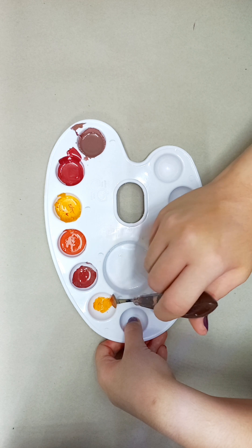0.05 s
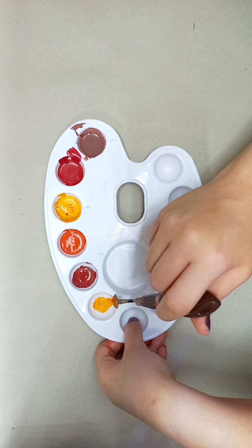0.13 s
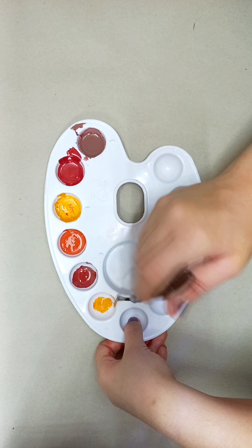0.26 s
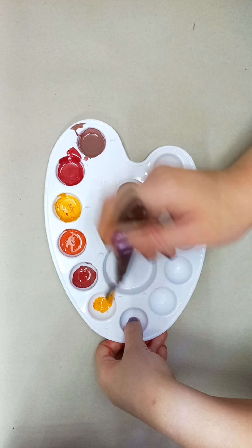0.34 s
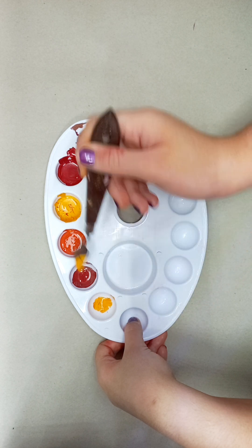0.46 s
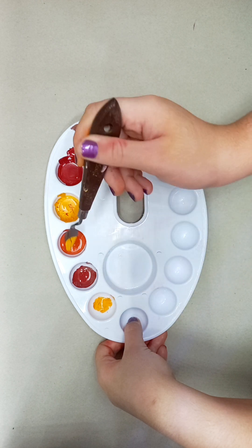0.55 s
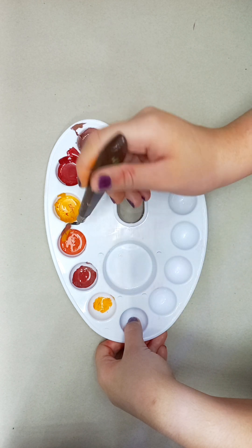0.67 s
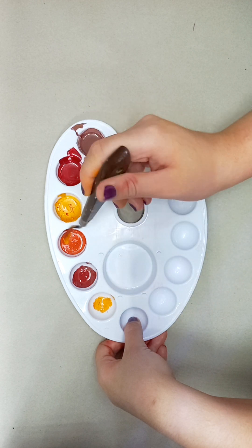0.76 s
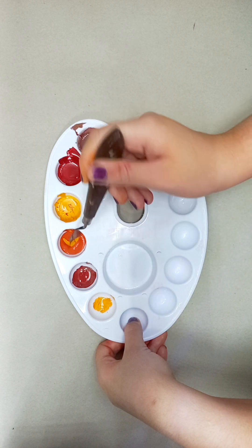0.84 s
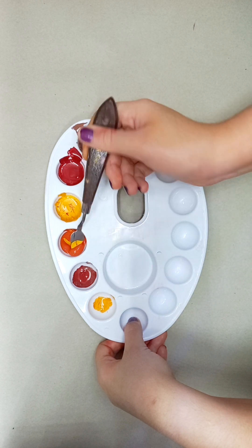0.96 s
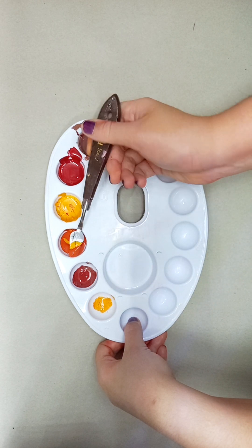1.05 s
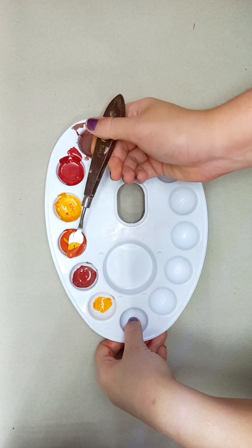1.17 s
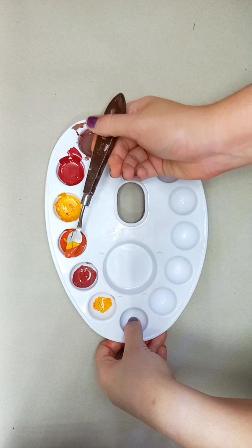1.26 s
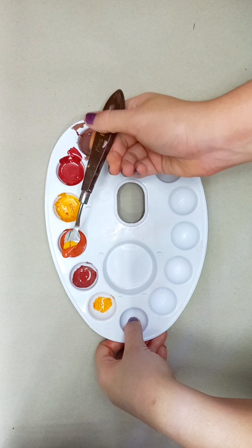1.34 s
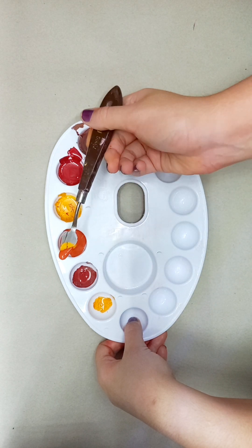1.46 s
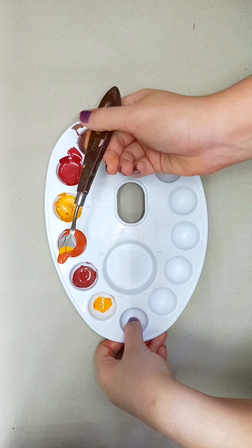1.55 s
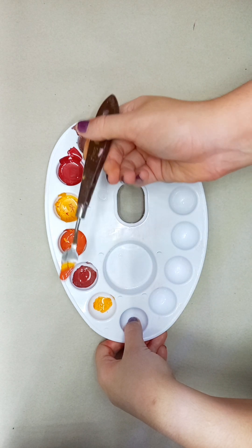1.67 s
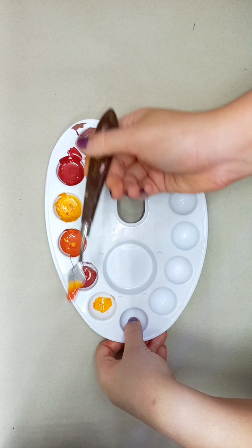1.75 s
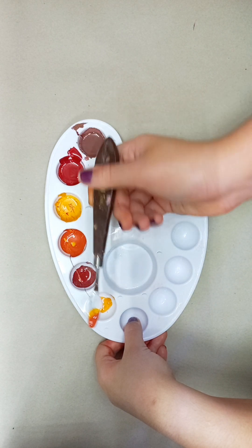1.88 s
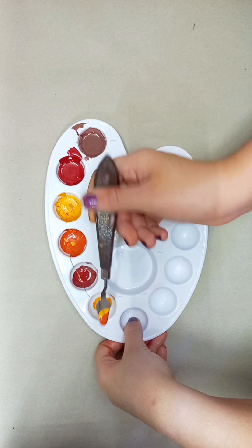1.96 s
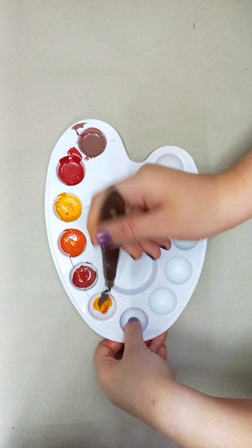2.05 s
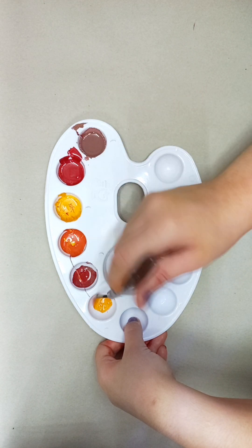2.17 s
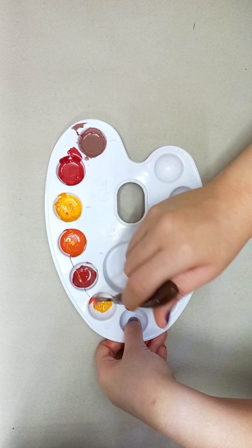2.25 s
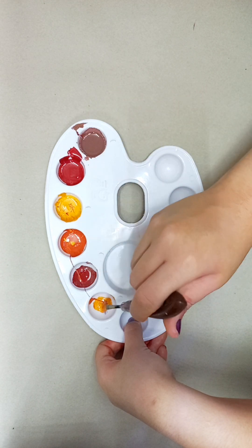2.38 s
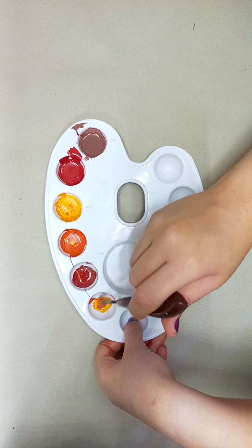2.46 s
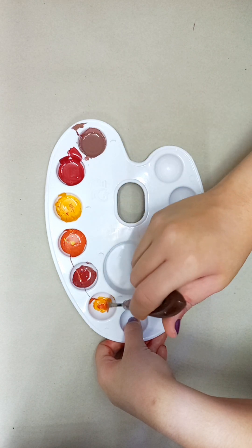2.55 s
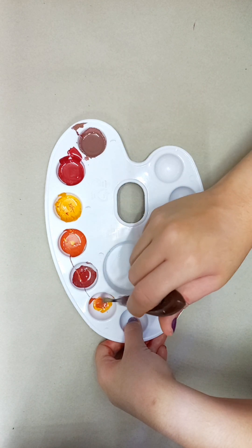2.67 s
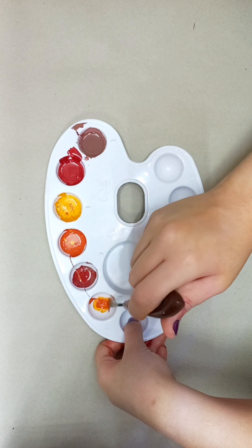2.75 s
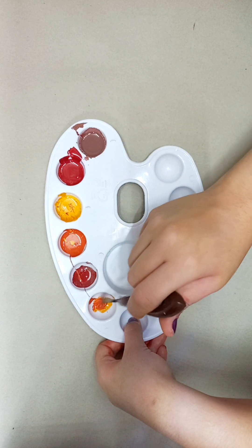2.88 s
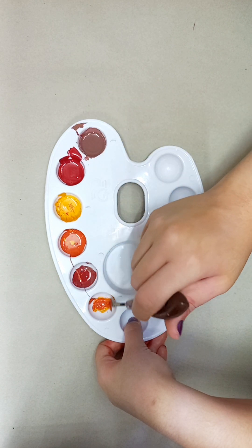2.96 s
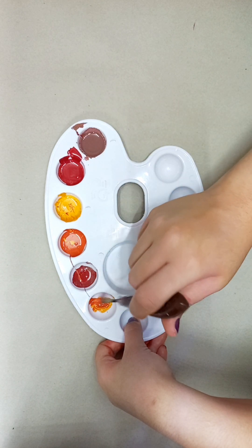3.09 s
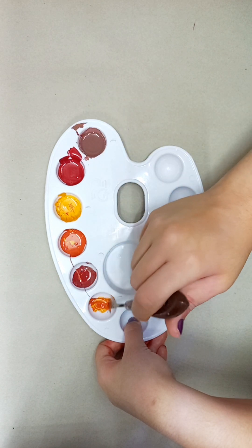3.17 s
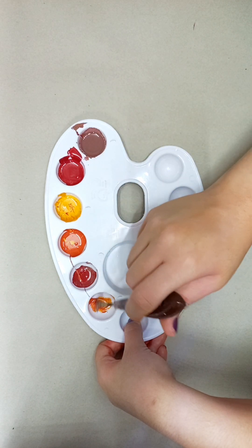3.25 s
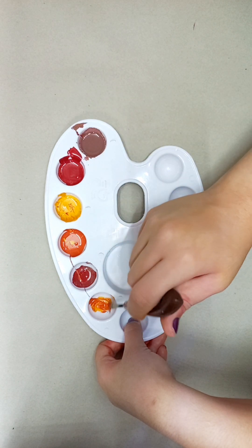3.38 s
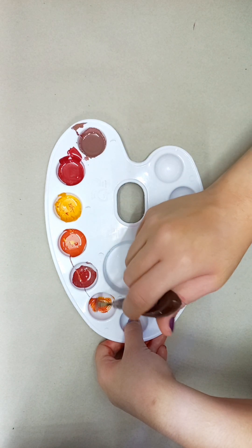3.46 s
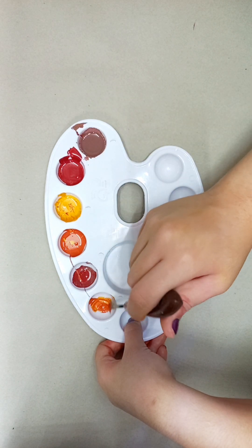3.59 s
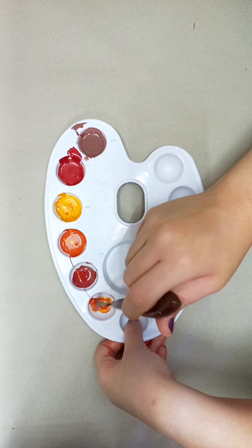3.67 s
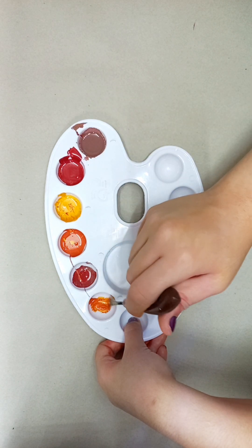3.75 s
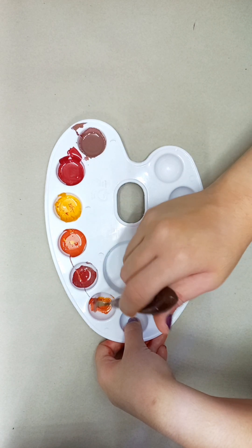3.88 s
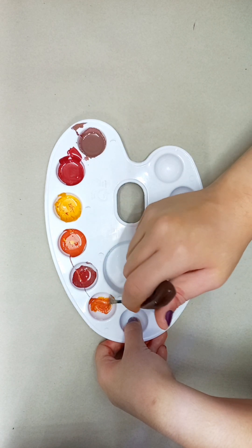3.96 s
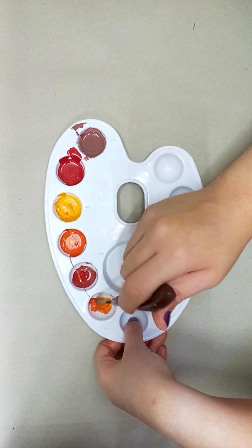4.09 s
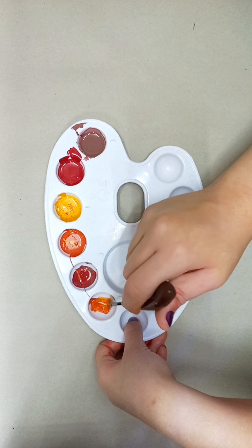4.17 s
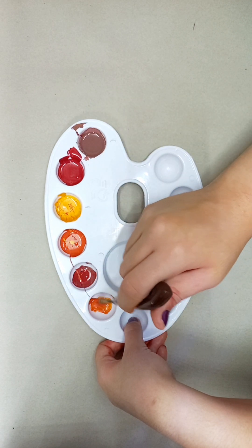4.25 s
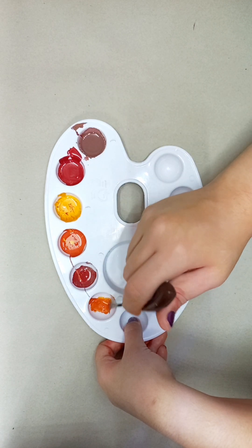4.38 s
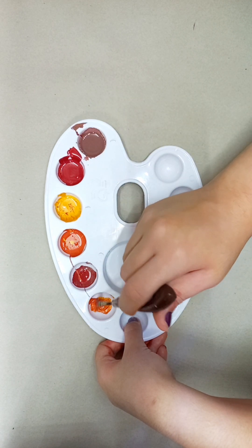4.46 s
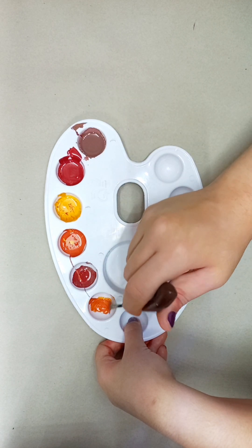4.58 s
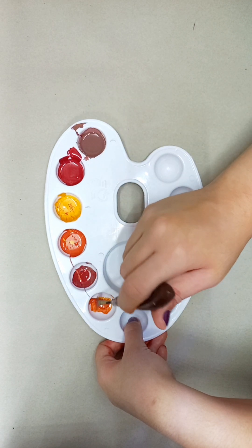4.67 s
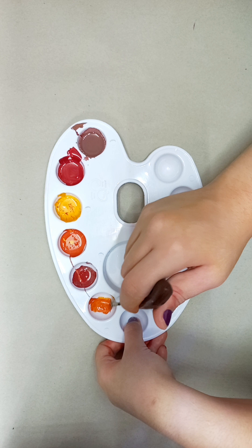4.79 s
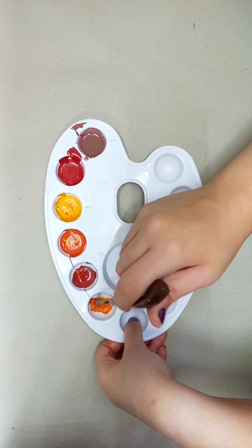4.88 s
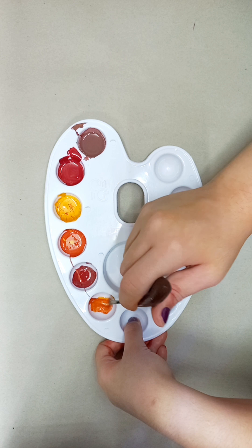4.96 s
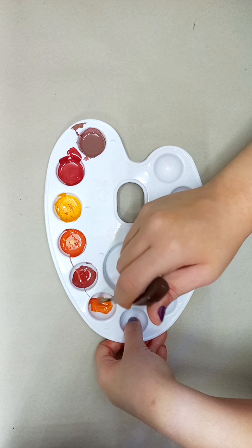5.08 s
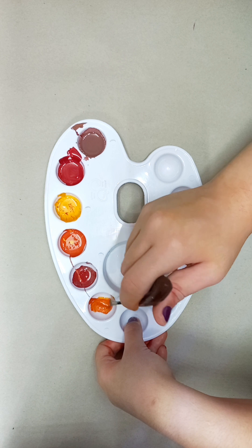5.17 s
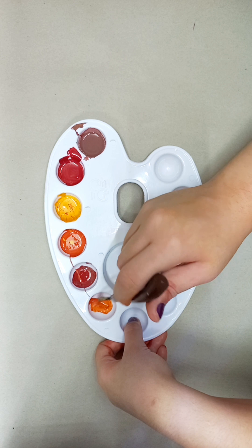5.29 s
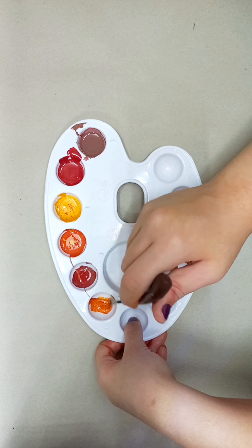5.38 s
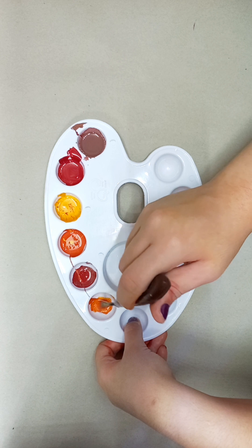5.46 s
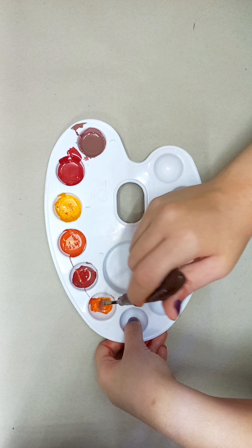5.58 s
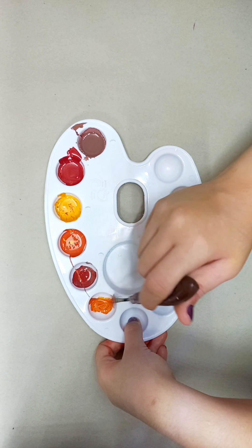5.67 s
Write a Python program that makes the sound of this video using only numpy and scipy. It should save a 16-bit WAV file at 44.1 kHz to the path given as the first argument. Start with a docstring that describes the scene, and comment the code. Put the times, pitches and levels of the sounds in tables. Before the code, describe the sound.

A metal palette knife knocks on a plastic palette, then stirs wet paint with steady clacks in a quiet room.

```python
"""A desk in a small quiet room: a steel palette knife works paint on a hand-held plastic palette.
It knocks paint off, scoops from another well, then stirs, clacking on the well's wall five times a second.
Each contact rings damped modes of plastic and steel; between contacts wet paint smears, crackles and pops.
The palette bumps and rumbles on the desk; ventilation hums in the background."""
import sys
import numpy as np
from scipy import signal
from scipy.fft import rfft, irfft, next_fast_len
from scipy.io import wavfile

SR = 44100
rng = np.random.default_rng(int(sys.argv[2]) if len(sys.argv) > 2 else 0)


def transcribe(u):
    """Save the signal u as a 16-bit wav file named by the first command-line argument.

    u: samples, shape (n,) or (channels, n), limited to [-1, 1]; the rate is SR.
    q: integer samples, one column per channel.
    """
    v = np.clip(np.atleast_2d(u).T, -1, 1)
    q = np.round(v * 32767).astype(np.int16)
    wavfile.write(sys.argv[1], SR, q)


N = 252693
TIME_S = np.arange(N) / SR
AGE_S = np.arange(SR // 15) / SR   # time since a contact
LEAD = SR // 10   # samples before time 0, so the room already rings
SIDES = np.array([[.5], [-.5]])   # splits a left-right difference

# desk thump spectrum: (frequency [Hz], density [dB])
DESK_SPECTRUM = [(70, 3.5), (130, 4.5), (250, 1), (350, -8.5), (500, 0), (650, -24.5), (900, -36)]
# blade meets the well's wall: (time [s], force [dB], well pitch [Hz], edge-on [dB])
STIR_CONTACTS = [(2.516, -10.5, 774, -2), (2.5756, -27, 780, -5), (2.6338, -23, 827, -11),
                 (2.6818, -9.5, 767, -17), (2.887, -1, 858, -5), (3.124, -1.5, 891, 4),
                 (3.3164, 0, 913, -2.5), (3.5186, .5, 912, -2), (3.727, -0.5, 926, 1.5),
                 (3.9399, -1, 934, 5), (4.1422, 1, 930, 1), (4.333, -2, 816, 2), (4.5175, 1, 895, -5.5),
                 (4.7221, 2, 913, -3), (4.9427, 0.83, 925, 3), (5.1429, -1, 870, 0.5),
                 (5.3314, 1.37, 925, 3)]
# scooping and spreading: (middle [s], half-width [s], smear [dB], rumble [dB])
PAINT_DRAGS = [(0.82, 0.026, -48.5, -64), (0.91, 0.068, -50.5, -62), (2.48, 0.05, -61, -50),
               (2.775, .035, -54.5, -51), (4.6, 0.023, -62, -46), (5.53, 0.086, -57, -52)]


def from_db(db):
    """Decibels to gain."""
    return 10 ** (np.asarray(db) / 20)


def unit_rms(x):
    """Scale to rms 1."""
    return x / np.sqrt(np.mean(x ** 2) + 1e-20)


def unit_hit(x):
    """Scale to rms 1 over the first 12 ms."""
    return x / np.sqrt(np.mean(x[:, :round(.012 * SR)] ** 2) + 1e-20)


def at_hz(points, hz):
    """Interpolate on a log-frequency axis."""
    point_hz, value = np.transpose(points)
    return np.interp(np.log(hz + 1), np.log(point_hz), value)


def coloured(x, spectrum, stretch=1):
    """Minimum-phase filter; falls steeply beyond the spectrum's ends."""
    taps = 8192 if x.shape[-1] > len(AGE_S) else 2048
    hz = np.fft.rfftfreq(taps, 1 / SR) / stretch + 1e-3
    skirts = np.clip(np.minimum(hz / spectrum[0][0], spectrum[-1][0] / hz), .3, 1) ** 6
    gain = from_db(at_hz(spectrum, hz)) * skirts
    cepstrum = irfft(np.log(gain))[:taps // 2]
    cepstrum[1:] *= 2
    kernel = irfft(np.exp(rfft(cepstrum, taps)))
    padded = next_fast_len(x.shape[-1] + taps, True)
    return irfft(rfft(x, padded) * rfft(kernel, padded), padded)[:, :x.shape[-1]]


def stereo_noise(size):
    """White noise, left and right alike in the bass only."""
    # diffuse field: (frequency [Hz], left-right correlation [1])
    correlation = [(50, 1), (130, 0.86), (280, 0.66), (700, 0.23), (1500, 0.21), (4000, 0), (7000, 0)]
    padded = next_fast_len(size, True)
    mid, side = rfft(rng.standard_normal((2, padded)))
    alike = np.clip(at_hz(correlation, np.fft.rfftfreq(padded, 1 / SR)), -.99, .99)
    left_right = np.sqrt(1 + alike) * mid + np.sqrt(1 - alike) * side * [[1], [-1]]
    return unit_rms(irfft(left_right, padded)[:, :size])


def diffuse(spectrum, size):
    """Coloured stereo noise, rms 1."""
    return unit_rms(coloured(stereo_noise(size), spectrum))


def fade(t, rise_s, t60_s):
    """Quick rise, exponential decay."""
    return (1 - np.exp(-t / rise_s)) * from_db(-60 * t / t60_s)


def burst(spectrum, rise_s, t60_s):
    """Decaying coloured noise."""
    return unit_hit(diffuse(spectrum, len(AGE_S)) * fade(AGE_S, rise_s, t60_s))


def add(track, time_s, sound):
    """Mix into a track that starts LEAD samples early."""
    start = max(0, LEAD + round(time_s * SR))
    sound = sound[:, :track.shape[1] - start]
    track[:, start:start + sound.shape[1]] += sound


def contact(rattle_db, t60_s=0.037):
    """One hard click, then the blade chatters as it settles."""
    click = AGE_S == 0
    chatter = stereo_noise(len(AGE_S)) * fade(AGE_S, 0.00047, t60_s)
    return click + from_db(rattle_db) * chatter / np.sqrt(np.sum(chatter[0] ** 2))


def ring(modes, stretch, rise_s):
    """Damped modes; level, pitch and phase vary with the point of contact."""
    out = 0
    for k, (hz, db, t60_s, pan_db, lead_rad) in enumerate(modes):
        scatter_db, detune, shift_rad = rng.standard_normal(3) * [2.5, .006, .25]
        phase = lead_rad * SIDES + shift_rad + k * np.pi / 2   # quadrature: neighbours do not cancel
        wave = np.sin(2 * np.pi * hz * stretch * (1 + detune) * AGE_S + phase)
        out = out + from_db(db + scatter_db + pan_db * SIDES) * wave * fade(AGE_S, rise_s, t60_s)
    return unit_hit(out)


def part(modes, cloud, force, ring_db, rise_s, pan_db, stretch=1):
    """One part of knife or palette: a few clear modes over a cloud of dense, short-lived ones."""
    dense = unit_hit(coloured(force, cloud, stretch))
    both = dense + from_db(ring_db) * ring(modes, stretch, rise_s)
    centred = both / np.linalg.norm(both, axis=1, keepdims=True)
    return unit_hit(centred * from_db(pan_db * SIDES))


def snap(rattle_db):
    """Bright crack of steel on plastic; a loose blade fizzes after it."""
    # spectra: (frequency [Hz], density [dB])
    crack_spectrum = [(4000, -39), (4800, 5), (5300, 6), (6100, 1), (7100, 12.5), (8000, -5.5), (10000, 3),
                      (12500, 4.5), (16000, -5)]
    fizz_spectrum = [(4500, -17), (5400, -5), (6200, 3), (6900, -3), (8600, 0.5), (10500, -4),
                     (13000, -7.5), (16000, -14)]
    crack = unit_hit(coloured(contact(rattle_db=1.5, t60_s=0.014), crack_spectrum))
    fizz = burst(fizz_spectrum, rise_s=0.00069, t60_s=0.049)
    return unit_hit(crack + from_db(rattle_db + 15) * fizz)


def tap(well_hz, well_db, plate_db, blade_db, tip_db, snap_db, rattle_db):
    """One contact rings the plastic well and plate, the steel blade and tip, and the desk below."""
    # modes: (frequency [Hz], level [dB], t60 [s], left-right [dB], left lead [rad])
    well_modes = [(762, -14.5, 0.044, 15, 0.14), (925, 5.5, 0.029, 8.5, 0.78), (1062, 3.5, 0.018, 5, 1)]
    plate_modes = [(1910, -12, 0.04, 1, -2.5), (2104, 1, 0.039, -4, 2), (2260, 6, 0.023, 6, -4.5)]
    blade_modes = [(2886, 24, 0.0082, 0.93, 1.16), (3010, -4.5, 0.013, 4.3, 5), (3110, 3, 0.015, 1.3, -5.5)]
    tip_modes = [(3666, 2.5, 0.04, 1.4, -2.8), (3900, -9, 0.045, 1.1, -1.1),
                 (4255, 18.5, 0.0057, 2.5, -0.99), (4760, -1, 0.011, 1.8, -0.88)]
    # dense modes around them: (frequency [Hz], density [dB])
    well_cloud = [(450, -25), (620, -25), (760, -1.5), (960, 1.5), (1100, 0), (1280, -20), (1550, -24.5),
                  (1800, -37)]
    plate_cloud = [(1400, -30), (1700, -1.5), (2100, 15.5), (2400, -18), (2800, -30.5)]
    blade_cloud = [(2250, -12.5), (2600, 0), (2800, 11), (3150, 4), (3450, -2), (4000, -35.5)]
    tip_cloud = [(3100, -27), (3550, 0), (4150, -1), (4550, -6), (5000, -18), (6000, -41.5)]
    on_plastic, on_steel = contact(rattle_db + 7.5), contact(rattle_db + 16)   # steel chatters more
    bend = 1 + 0.0071 * rng.standard_normal()   # bending shifts the blade's pitch
    press = well_hz / well_modes[1][0]   # pressing raises the well's pitch
    well = part(well_modes, well_cloud, on_plastic, ring_db=-3, rise_s=.002, pan_db=0, stretch=press)
    plate = part(plate_modes, plate_cloud, on_steel, ring_db=0, rise_s=.00036, pan_db=2)
    blade = part(blade_modes, blade_cloud, on_steel, ring_db=-1.5, rise_s=.0013, pan_db=1.5, stretch=bend)
    tip = part(tip_modes, tip_cloud, on_steel, ring_db=-2.5, rise_s=.00024, pan_db=1.5)
    plastic = from_db(well_db) * well + from_db(plate_db) * plate
    steel = from_db(blade_db) * blade + from_db(tip_db) * tip + from_db(snap_db) * snap(rattle_db)
    desk = from_db(well_db - 22.5) * burst(DESK_SPECTRUM, rise_s=.0005, t60_s=0.19)
    return plastic + steel + desk


def knocks():
    """The free blade lands: a tap, plus the palette hits the desk, its sheet clacks, the steel clinks."""
    # (time [s], force [dB], well pitch [Hz], bare steel [dB], on plate [dB], flat-on [dB],
    #  desk [dB], rattle [dB])
    blows = [(-0.035, -1, 832, 4, -3, -4, -65, -8), (0.0908, 0, 863, 0.5, 0, -2, -60, -4),
             (0.1975, 0, 883, -0.5, -2, 0, -60, -2), (0.7744, -14.5, 733, 4.5, 0, 8, -41, -10.5),
             (0.859, -15, 750, -7, 12, 1, -62, -8), (0.9309, -28.5, 970, -3, 12, 20, -43.5, -8),
             (2.2842, -34.5, 843, -4, -8, -8, -80, -15), (2.3853, -5, 860, -1.5, 0, 10.5, -58, -28)]
    # whole sheet, free blade: (frequency [Hz], level [dB], t60 [s], left-right [dB], left lead [rad])
    sheet_modes = [(1147, 7, 0.023, 4.5, 0.5), (1298, -7, 0.037, -1, 0.097), (1490, -5.5, 0.02, 0, 0.51),
                   (1700, -6.5, 0.026, -4, 0.13), (2370, -23.5, 0.018, 6, -0.57)]
    clink_modes = [(2484, 2, 0.034, -2, -.4), (4153, 1, 0.031, -4, -0.34), (4250, 7.5, 0.016, -4, 0.058),
                   (4640, -4, 0.012, -11, 0.31), (8840, -18, 0.021, 6, 0.63)]
    # free blade's dense modes: (frequency [Hz], density [dB])
    clink_cloud = [(2200, -22), (2500, -2), (3000, -27), (3800, -2.5), (4150, 5), (4450, -9), (4800, -7),
                   (5600, -21), (8600, -16), (11000, -28)]
    out = np.zeros((2, LEAD + N))
    for time_s, force_db, well_hz, bare_db, on_plate_db, flat_db, desk_db, rattle_db in blows:
        steel_db = force_db + bare_db
        hit = tap(well_hz, well_db=force_db - 23.5, plate_db=force_db + on_plate_db - 37,
                  blade_db=1.32 * force_db - 27.5, tip_db=steel_db - 29,
                  snap_db=steel_db + 0.21 * rattle_db - 31.5, rattle_db=rattle_db)
        hit += from_db(desk_db) * burst(DESK_SPECTRUM, rise_s=.001, t60_s=0.047)
        hit += from_db(force_db + flat_db - 37) * ring(sheet_modes, stretch=0.97, rise_s=0.00076)
        force = contact(rattle_db=-2)
        clink = part(clink_modes, clink_cloud, force, ring_db=-1.5, rise_s=0.00041, pan_db=-0.5)
        add(out, time_s, hit + from_db(steel_db - 27.5) * clink)
    return out * from_db(-SIDES)   # 1 dB to the right


def room(x, wet_db=-9, gap_s=0.0052, echo_s=0.0065, echo_db=-25):
    """One near reflection and a diffuse tail."""
    # tail: (frequency [Hz], level [dB])
    spectrum = [(150, 2.5), (500, 9), (950, 0), (1450, 7.5), (2100, 2.5), (2850, -2), (3400, 2.5),
                (4200, 3), (7000, 2), (15000, 1)]
    t = np.arange(SR * 2 // 3) / SR
    tail = diffuse(spectrum, len(t)) * fade(np.maximum(t - gap_s, 0), rise_s=0.014, t60_s=0.31)
    response = from_db(wet_db) * unit_rms(tail) / np.sqrt(len(t))
    response[:, round(echo_s * SR)] += from_db(echo_db)
    return x + signal.fftconvolve(x, response, axes=1)[:, :x.shape[1]]


def ventilation(air_db=-50.5):
    """Narrow noise drones over steady room air."""
    # air: (frequency [Hz], density [dB])
    air_spectrum = [(15, -67), (25, -53), (53, -15), (74, -1.5), (120, -1.5), (141, -11.5), (174, -0.5),
                    (200, -18.5), (255, -11.5), (299, -19), (449, -20), (857, -25), (6000, -33),
                    (7600, -45), (15800, -30.5)]
    # hum: (frequency [Hz], filter width [Hz], level [dB])
    drones = [(68.4, 3.8, -64.5), (176.2, 2.66, -64.5), (255.7, 7.4, -73)]
    out = from_db(air_db) * diffuse(air_spectrum, N)
    for hz, width_hz, db in drones:
        b, a = signal.iirpeak(hz, hz / width_hz, fs=SR)
        noise = rng.standard_normal(N + SR)
        drone = signal.lfilter(b, a, signal.lfilter(b, a, noise))[SR:]   # 1 s to settle
        out += from_db(db) * unit_rms(drone)
    return out


def swell(middle_s, width_s):
    """One push of the hand: Gaussian, peak 1."""
    return np.exp(-.5 * ((TIME_S - middle_s) / width_s) ** 2)


def sweeps(per_force, delay_s=0.058, width_s=0.11):
    """Blade speed round the well: a swell after each clack, smaller after a gentle one."""
    return np.max([from_db(per_force * force_db) * swell(time_s + delay_s, width_s)
                   for time_s, force_db, *_ in STIR_CONTACTS], axis=0)


def handling(hold_db=-58.5, sweep_db=-53):
    """The held palette rumbles on the desk, more with each sweep and drag."""
    # rumble: (frequency [Hz], density [dB])
    spectrum = [(35, -38.5), (65, 7.5), (110, 0.5), (200, -9.5), (500, -19), (900, -78)]
    drags = sum(from_db(db) * swell(time_s, width_s) for time_s, width_s, _, db in PAINT_DRAGS)
    pushes = from_db(sweep_db) * sweeps(per_force=.2) + drags
    return np.hypot(from_db(hold_db), pushes) * diffuse(spectrum, N)


def smear(slips_per_s=1800, spread_db=5, hiss_db=4.5, sweep_db=-54.5):
    """Fine slips of the blade in wet paint, over a soft hiss."""
    # slips and hiss: (frequency [Hz], density [dB])
    spectrum = [(300, -11), (750, 3), (1400, -2.5), (2000, -5.5), (2900, -3), (4100, -6.5), (5500, -15.5),
                (10000, -21.5), (16000, -17)]
    slips = rng.random(N) < slips_per_s / SR
    sizes = from_db(spread_db * np.minimum(rng.exponential(1, N), 4))
    hiss = diffuse(spectrum, N)
    grains = unit_rms(coloured(slips * sizes * rng.standard_normal((2, N)), spectrum))
    drags = sum(from_db(db) * swell(time_s, width_s) for time_s, width_s, db, _ in PAINT_DRAGS)
    motion = from_db(sweep_db) * sweeps(per_force=.15) + drags
    return motion * unit_rms(grains + from_db(hiss_db) * hiss)


def stirring(thinning_db_per_s=1.36, mid_stir_s=4.0):
    """The blade clacks on the well's wall; a harder turn makes a shorter, brighter contact."""
    # well, plate, blade, tip, snap: (base level [dB], force slope [dB/dB], edge-on slope [dB/dB])
    response = [(-27.5, 1.0, -0.08), (-34, 0.96, 0.03), (-24.5, 1.88, 0.2), (-34, 1.9, 0.76),
                (-37.5, 2.5, 1.0)]
    out = np.zeros((2, LEAD + N))
    for time_s, force_db, well_hz, edge_db in STIR_CONTACTS:
        well_db, plate_db, blade_db, tip_db, snap_db = [
            db + per_force * force_db + per_edge * edge_db for db, per_force, per_edge in response]
        plate_db += thinning_db_per_s * (time_s - mid_stir_s)   # spread paint damps the plate less
        clack = tap(well_hz, well_db, plate_db, blade_db, tip_db, snap_db, rattle_db=-17)
        add(out, time_s, clack)
    return out


def crackle(ticks_per_s=110, base_db=-48.5, spread_db=5, cap_db=9):
    """Stirred paint tears in tiny bright ticks, mostly in mid-sweep."""
    # tick: (frequency [Hz], density [dB])
    spectrum = [(3000, -16), (4500, 2), (7000, -6), (11000, 7), (16000, 3)]
    ticks = rng.random(N) < sweeps(per_force=1.8) * ticks_per_s / SR
    sizes = from_db(base_db + np.minimum(spread_db * rng.exponential(1, N), cap_db))
    return coloured(ticks * sizes * rng.standard_normal((2, N)), spectrum)


def pops():
    """Threads of sticky paint part, each with one tick."""
    # (time [s], peak [dB], frequency [Hz])
    threads = [(3.381, -38.5, 1330), (3.62, -40, 7200), (4.012, -39, 7500), (4.40, -43, 6500),
               (4.604, -37, 10800), (4.80, -40, 6500), (5.513, -41.5, 11500)]
    out = np.zeros((2, LEAD + N))
    for time_s, db, hz in threads:
        tick = burst([(hz / 2, -20), (hz, 0), (hz * 2, -20)], rise_s=0.00022, t60_s=0.0056 + 43 / hz)
        add(out, time_s, from_db(db) * tick / np.abs(tick).max())
    return out


def scene(left_db=0.5):
    """Contacts and pops in the room, plus dry paint noise, rumble and ventilation."""
    work = room(stirring() + knocks() + pops())[:, LEAD:] * from_db(left_db * SIDES)
    return work + smear() + crackle() + handling() + ventilation()


def record(dry):
    """Steep low-pass at 16 kHz."""
    return signal.sosfilt(signal.ellip(10, .1, 80, 16000, fs=SR, output="sos"), dry)


dry = scene()
out = record(dry)
transcribe(out)
```